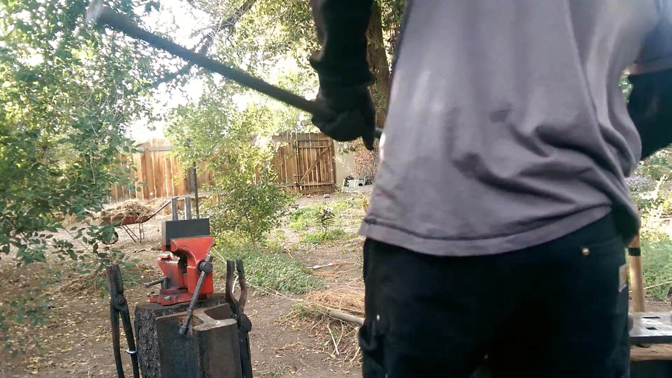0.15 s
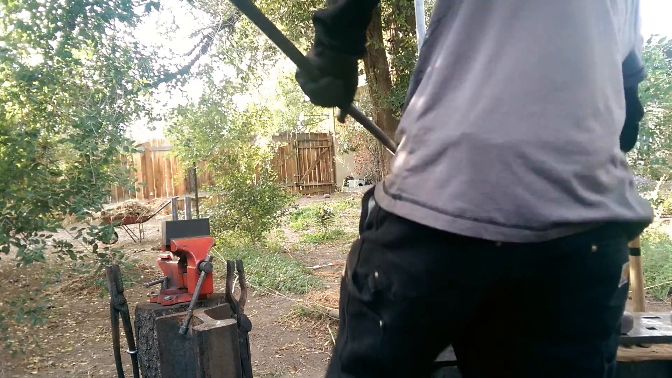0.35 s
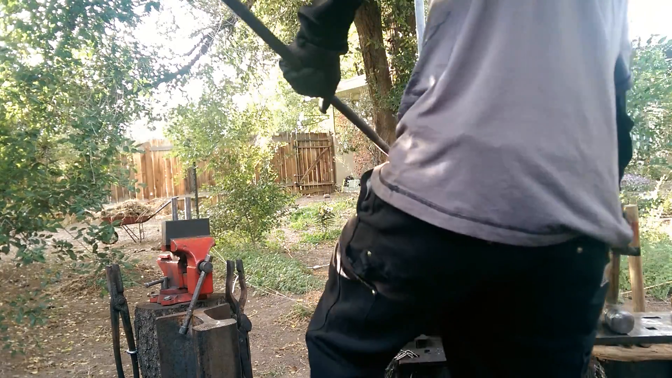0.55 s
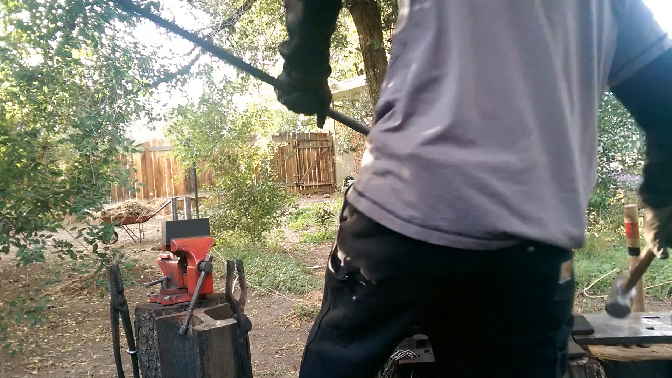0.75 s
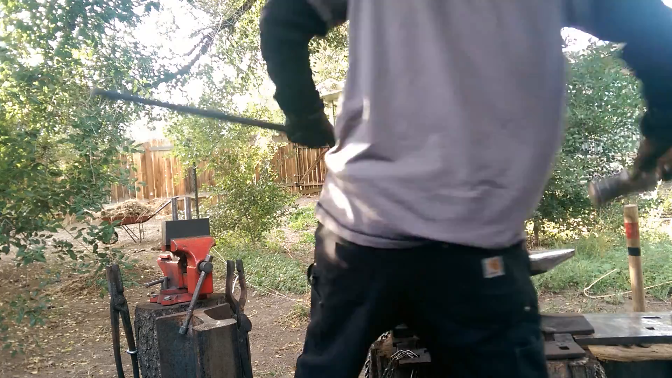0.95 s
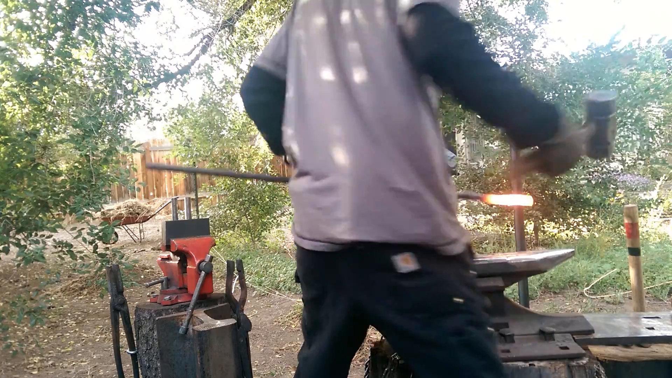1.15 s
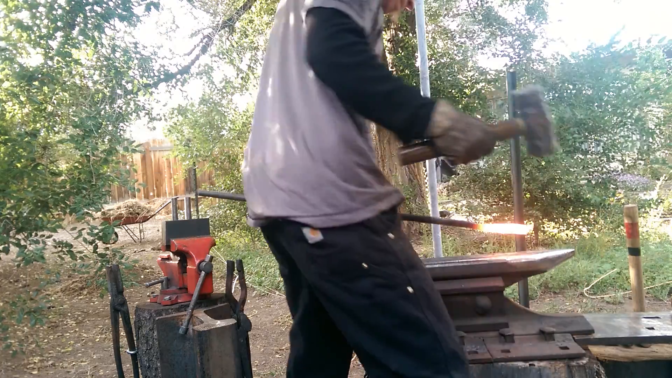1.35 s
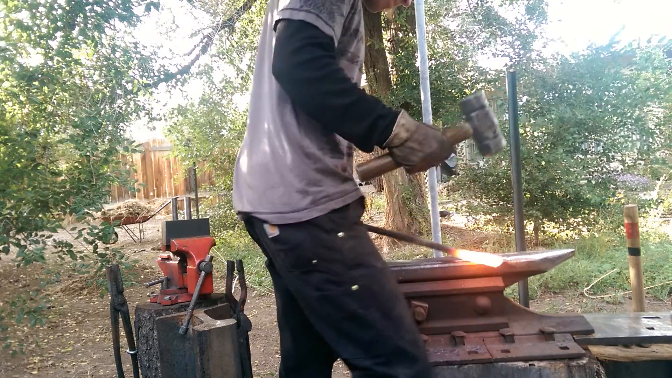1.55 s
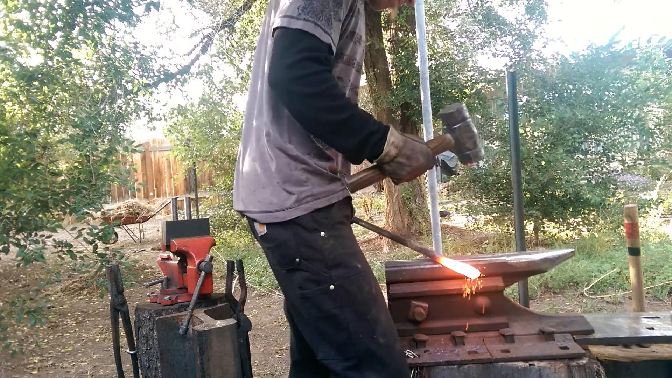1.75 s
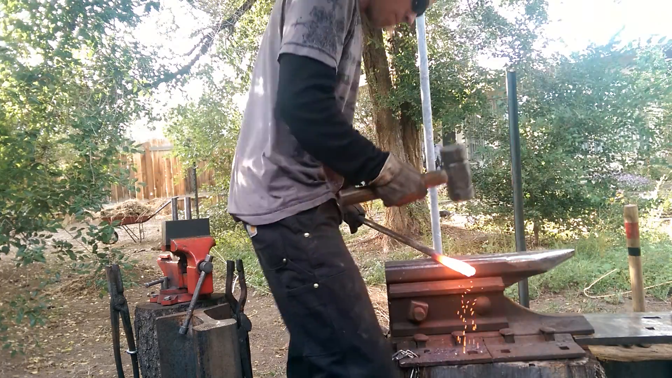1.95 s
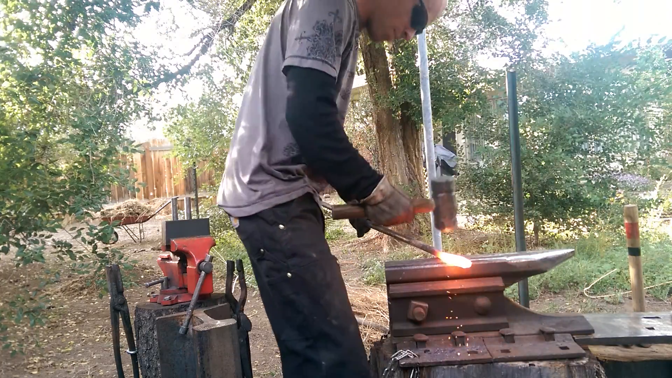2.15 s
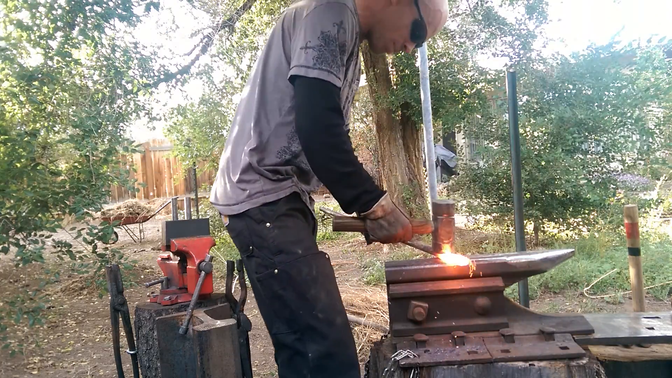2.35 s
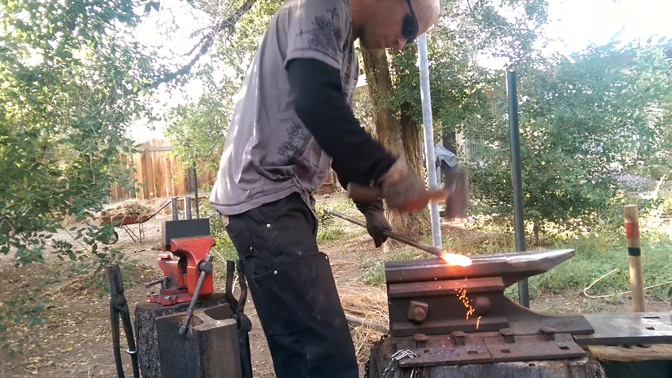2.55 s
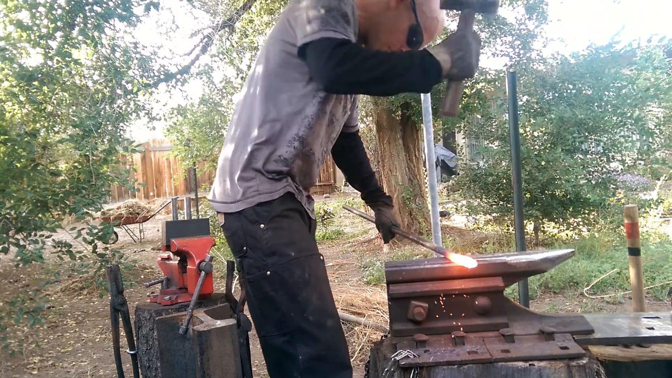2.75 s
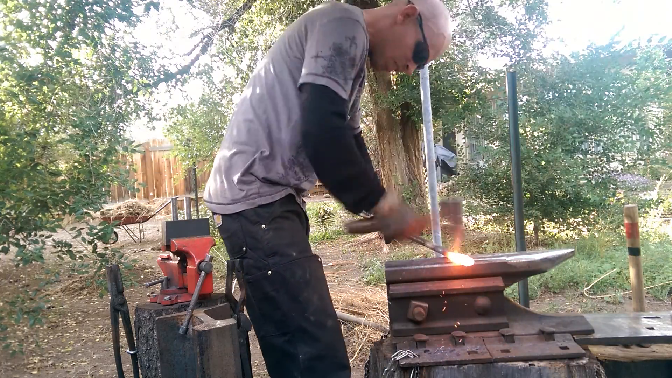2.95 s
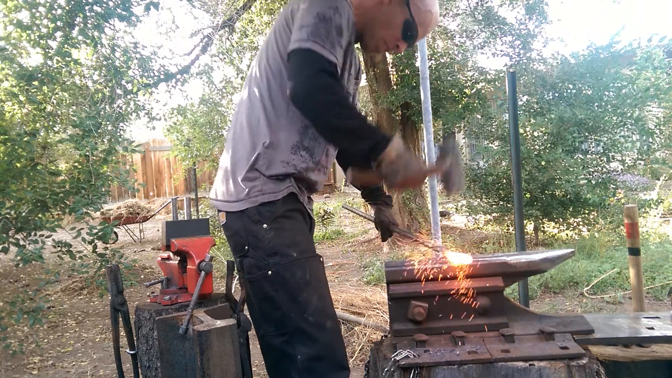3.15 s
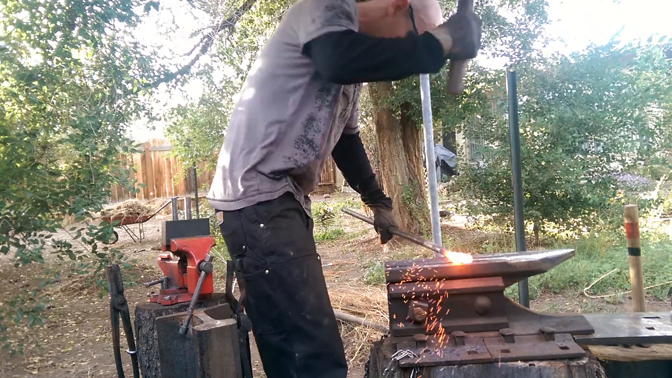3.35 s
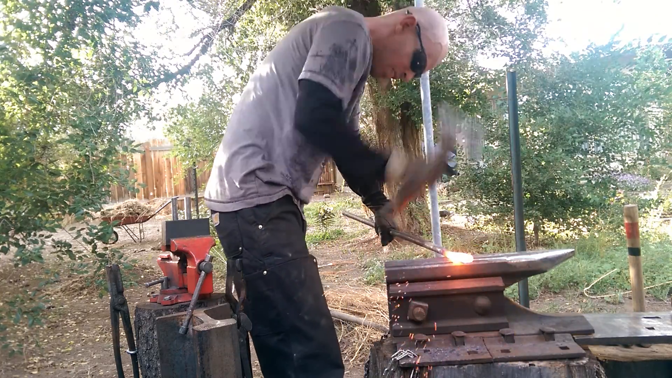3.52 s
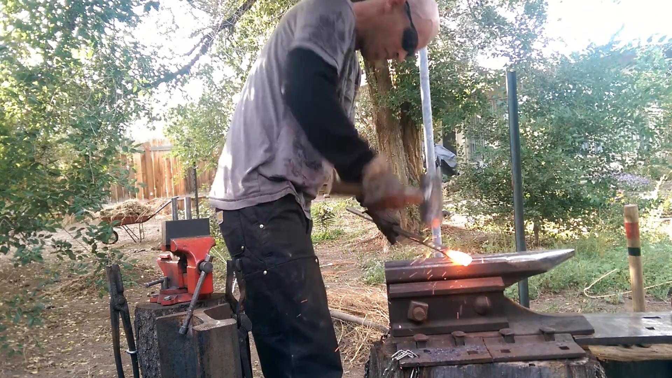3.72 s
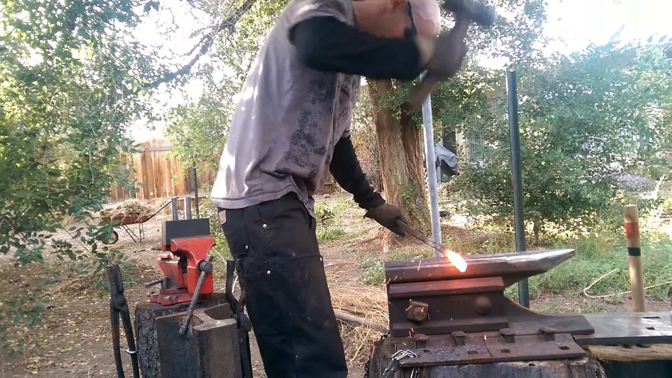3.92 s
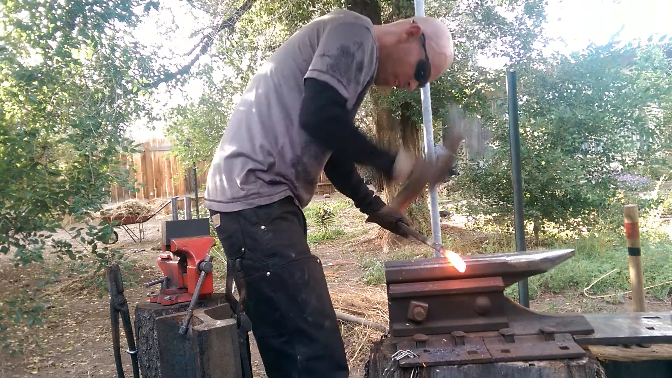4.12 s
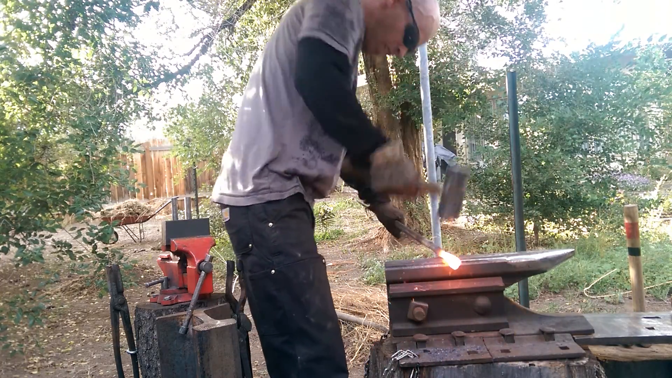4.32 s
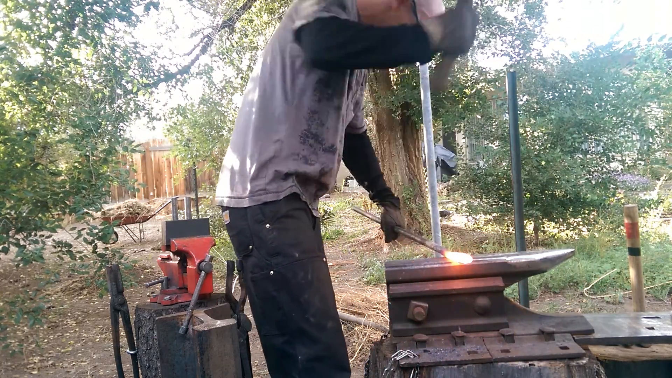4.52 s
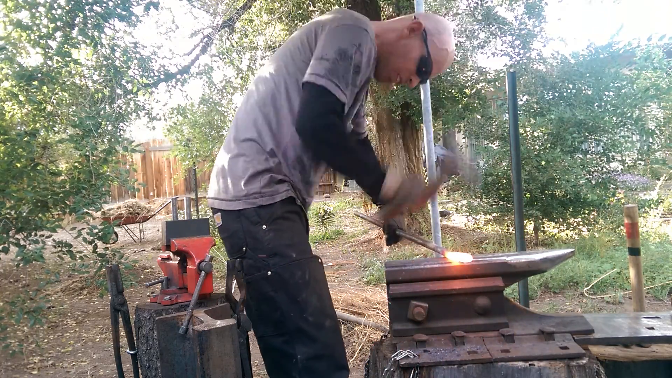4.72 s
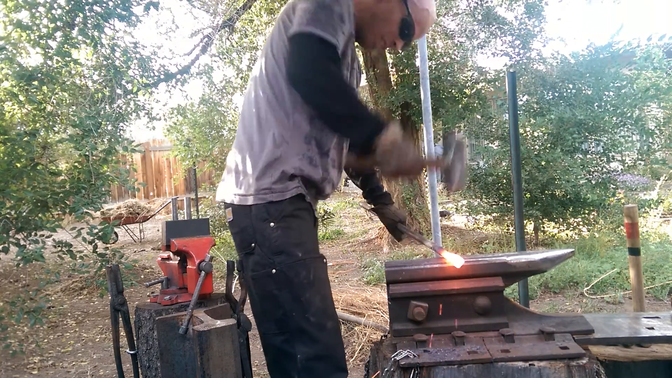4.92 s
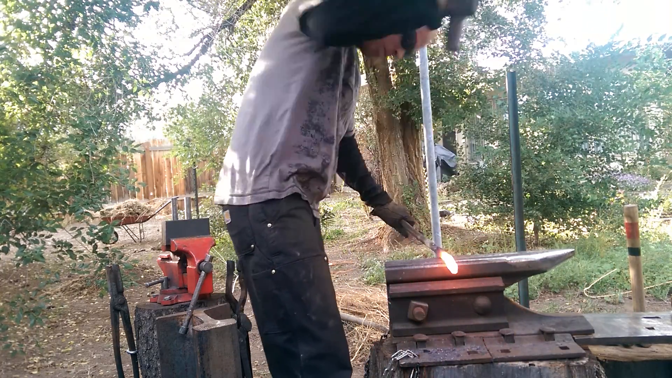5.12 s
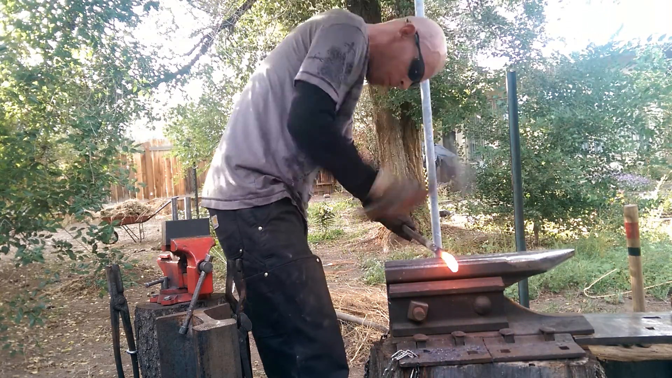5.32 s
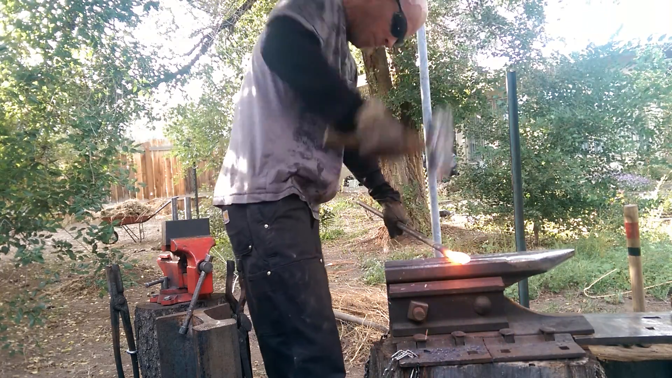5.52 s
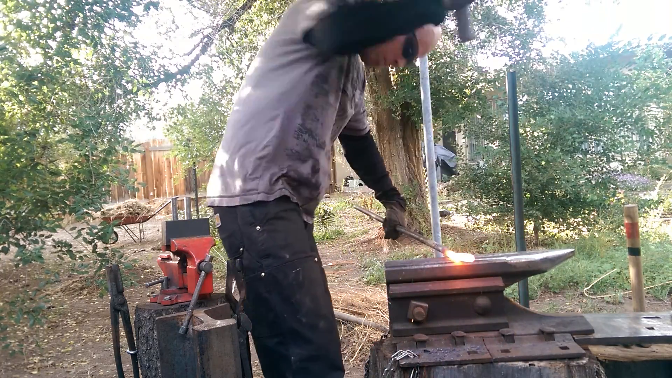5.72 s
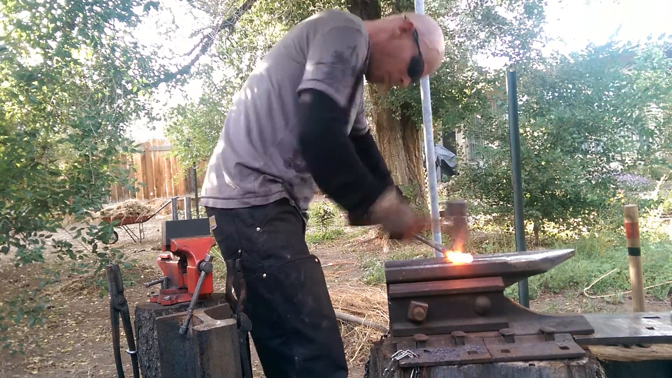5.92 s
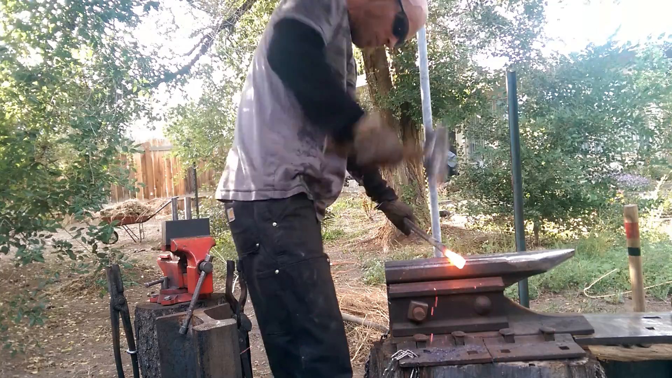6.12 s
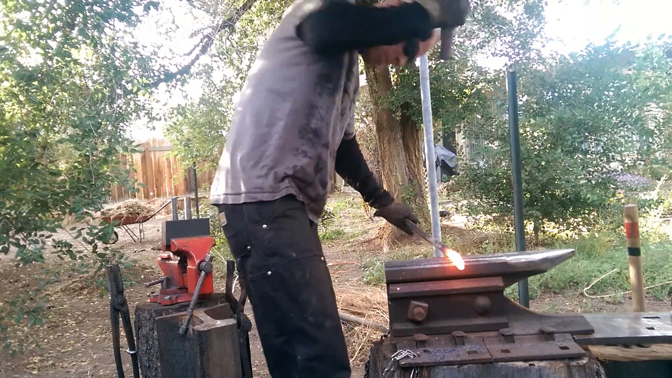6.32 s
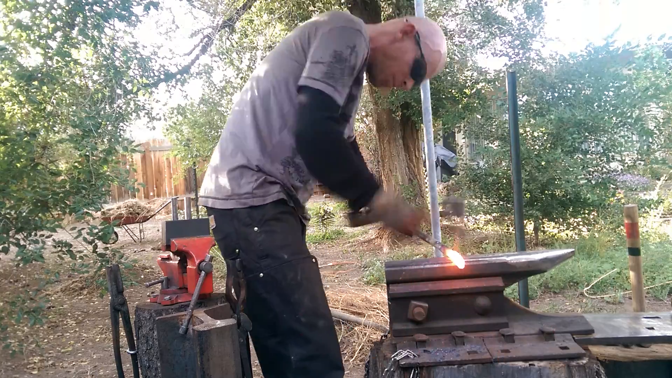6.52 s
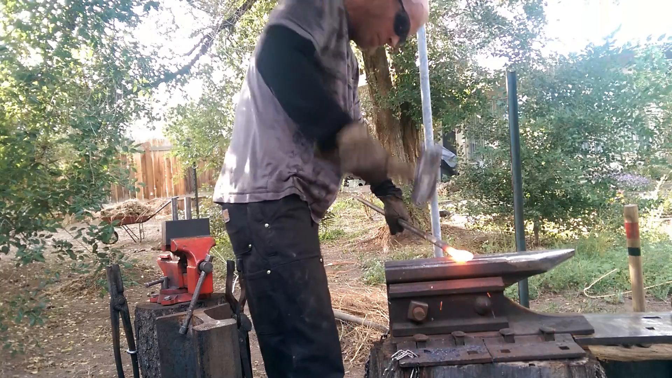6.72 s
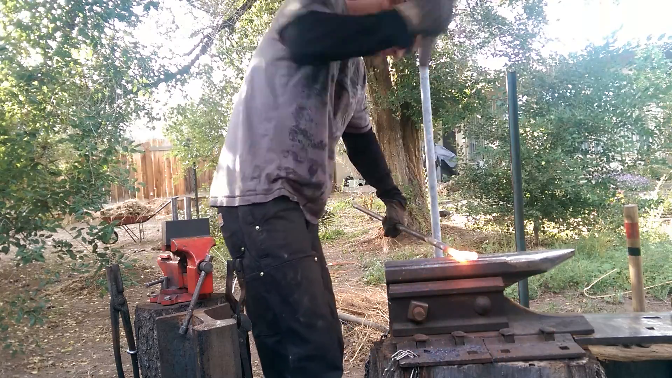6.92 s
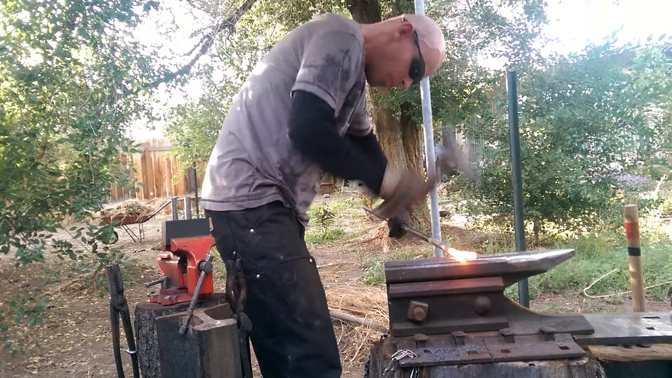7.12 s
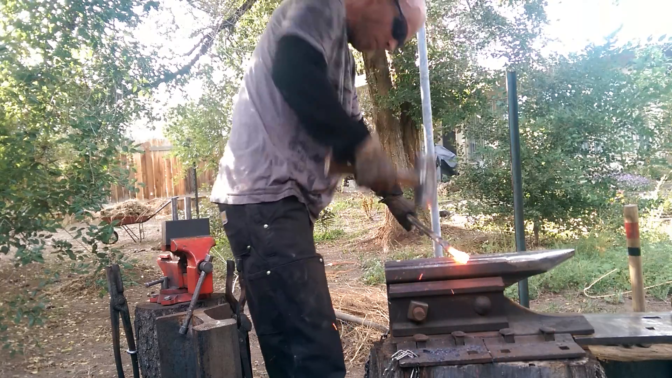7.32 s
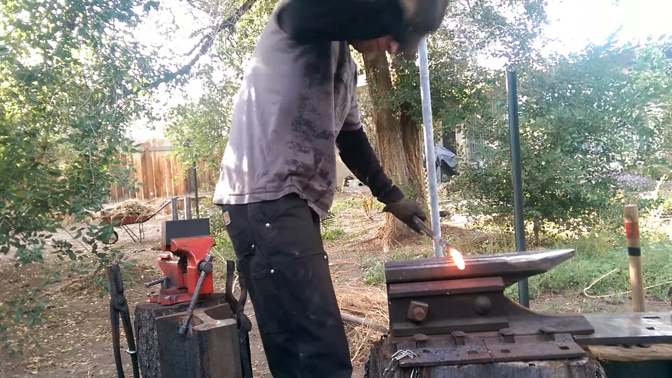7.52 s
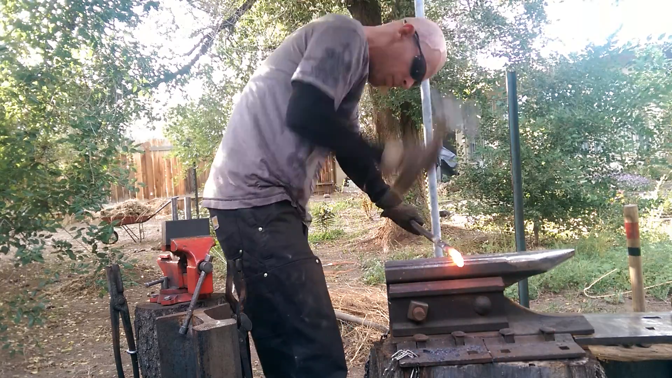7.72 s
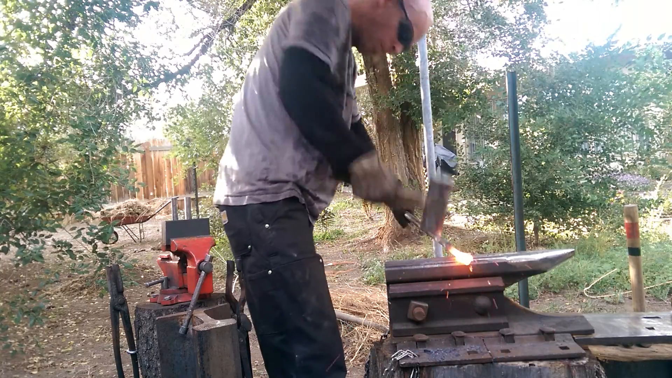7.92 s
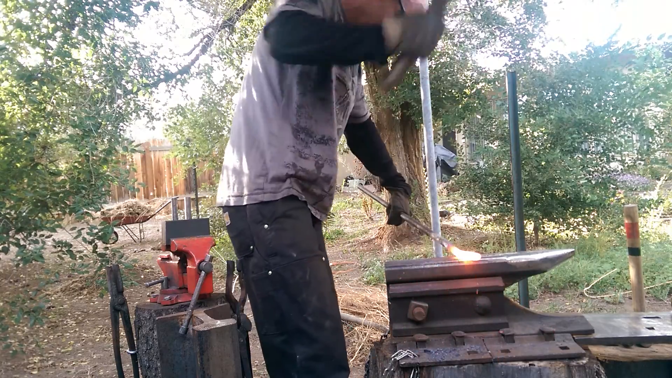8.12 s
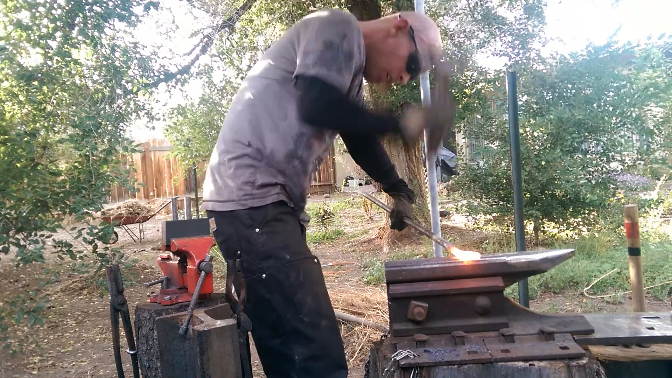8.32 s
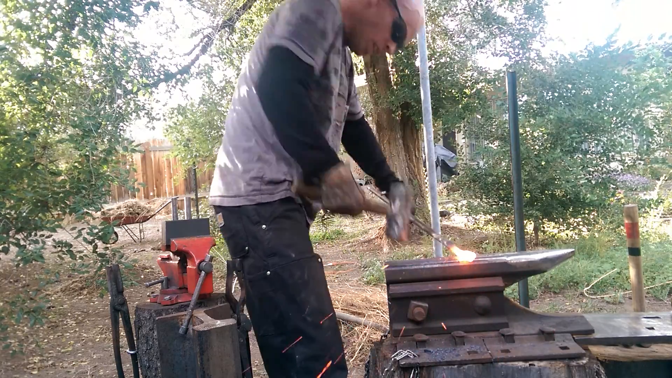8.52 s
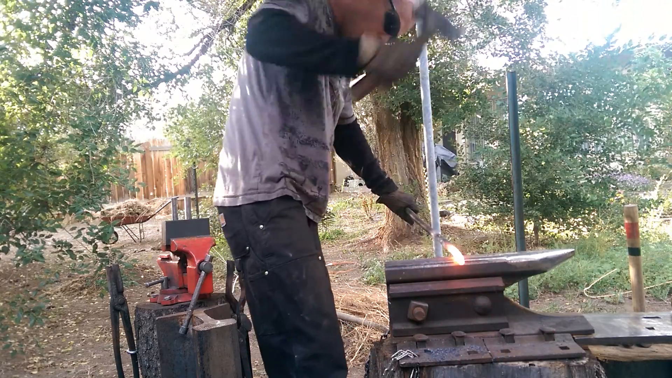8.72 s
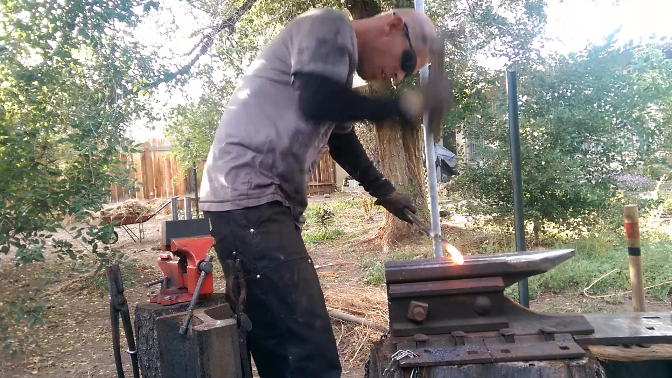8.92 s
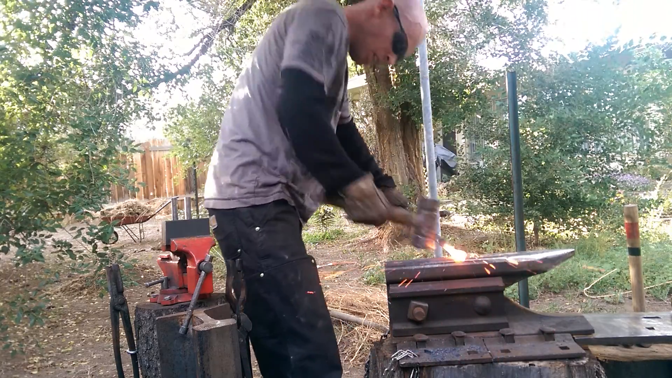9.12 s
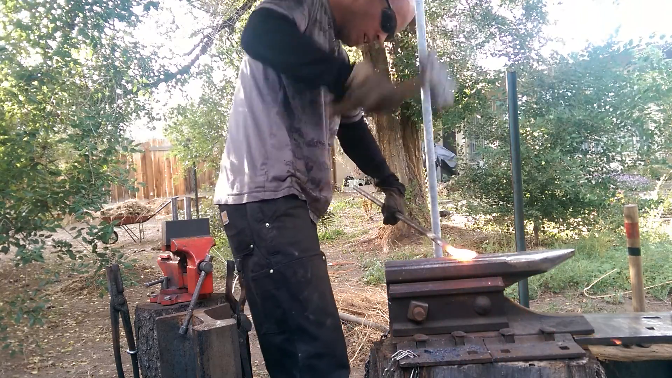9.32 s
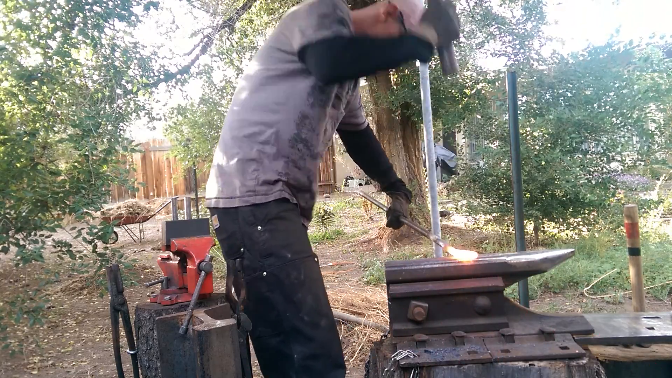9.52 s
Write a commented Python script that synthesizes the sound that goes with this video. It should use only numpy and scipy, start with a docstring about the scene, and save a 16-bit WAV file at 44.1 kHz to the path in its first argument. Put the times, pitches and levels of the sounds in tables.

```python
"""Forging in the yard

A hand hammer works a hot bar on a clamped rail anvil, off to the right. Each blow cracks, knocks,
thumps the stump and leaves anvil and hammer head ringing; fence and trees throw the crack back.
Forge coals snap and hiss nearby over a low outdoor rumble. Before the blows start, boots scuff and
the bar is laid down, slid and nudged; midway through the hammering a bird squeaks once."""
import sys
import numpy as np
from scipy import signal
from scipy.fft import rfft, irfft
from scipy.io import wavfile
from scipy.ndimage import uniform_filter1d

SR = 44100
rng = np.random.default_rng(int(sys.argv[2]) if len(sys.argv) > 2 else 0)


def master_out(mix):
    """Clip the mix to full scale and print it as 16-bit PCM to the path in sys.argv[1]."""
    frames = np.transpose(np.atleast_2d(mix))
    ceiling = np.clip(frames, -1, 1)
    pcm = np.round(ceiling * 32767).astype(np.int16)
    wavfile.write(sys.argv[1], SR, pcm)


N = 421155

# Tone of the outdoor bed. Each row: frequency in Hz, relative noise density in dB.
AIR_SPECTRUM = [(15, -18), (25, -12), (76, 5), (130, -2), (170, -17), (270, -13), (344, -21), (405, -20.5),
                (677, -20.5), (863, -21.5), (988, -24), (2350, -26), (5570, -38.5), (12500, -36.5),
                (16000, -42.5)]
# Snapping coals. Each row: start in seconds, peak in dB, dull body against the bright top in dB,
# left minus right in dB.
COAL_SNAPS = [(0.0014, -9, -16, 1.0), (0.0548, -28, -31, 5), (0.077, -15, -18, 6), (0.1165, -28, -28, -3),
              (0.1331, -2, -24, 5.5), (0.18, -25, -6, 0), (0.197, -21, -30, 8), (0.2224, -22, -13, 0),
              (0.238, -5.5, -10, 1.5), (0.2575, -21, -18, 7), (0.275, -24, -6, 9), (0.2855, -15.5, -7, 0),
              (0.312, -11, -23, 5), (0.355, -32, -26, 9), (0.3795, -29, -31, 5.5), (0.394, -22, -35, 6),
              (0.411, -22.5, -23, 8), (0.4214, -27, -8, -2), (0.4974, -21.5, -1.5, 2),
              (0.606, -36, -21, -2), (0.6215, -32, -20, -1.5), (0.6496, -27, -7, 4), (0.7122, -10, -20, 4),
              (0.7455, -30, -6, 6), (0.7953, -19, -9.5, 4), (0.85, -30, -15, 2), (0.9028, -34, -20, 6),
              (0.9563, -31, -20, 4), (0.9777, -23.5, -20, 4), (1.024, -34, -31, 6),
              (1.1171, -12.5, -12, 1.5), (1.2108, -24.5, -12, -2), (1.3461, -28.5, -5.5, 3),
              (1.4, -36, -19, 4), (1.429, -32, -23, 2), (1.5384, -3.5, -29, 5.5), (1.7365, -30, -22, 5),
              (1.7839, -11, -40, 3.5), (1.821, -23, -31, 1), (1.8527, -27, -33, 4), (1.9122, -34, -23, 4),
              (2.0198, -32.5, -32, 5), (2.0605, -26.5, -21, 2), (2.2366, -24, -9, 3),
              (2.4605, -27.5, -29, 3), (2.4794, -33, -31, 4), (2.6204, -18.5, -27, 0), (2.863, -32, -29, 5),
              (3.2236, -25.5, -4, 5), (3.27, -22.5, -9, 3), (3.3165, -20, -8.5, 2.5),
              (3.5405, -16, -27, 3.5), (3.5957, -28, -24.5, 5), (3.717, -18, -12, -1),
              (3.9043, -12, -18, 5.5), (4.992, -19.5, -18, 1), (5.649, -34, -8, -1), (5.9914, -24, -20, 9),
              (6.5316, -26.5, -9, 3), (6.8522, -7.5, -22, 1.5), (7.1564, -28.5, -1, 2),
              (7.4726, -32.5, 0, 2), (8.6544, -35, -15, -4), (8.76, -33, -10, 3), (8.7781, -15.5, -2, 2),
              (9.4642, -25, -28, 6.5)]
# The yard's echo. Each row: band centre in Hz, relative level in dB, time to fall 60 dB in seconds.
ECHO_BANDS = [(131.5, -10.5, 0.93), (246, -24, 0.44), (502, -25.5, 0.76), (1100, -23.5, 0.52),
              (2326, -21.5, 0.5), (4160, -21, 0.4), (8200, -22, 0.32), (14000, -42, .25)]
# Boots and bar scuffing. Each row: end of the attack in seconds, hold in seconds, level in dB,
# tonal centre in Hz.
SCUFFS = [(0.241, .06, -54, 900), (0.549, .04, -61, 706), (.85, 0.084, -56, 1000),
          (1.201, .16, -50.5, 1790), (2.279, 0.089, -49.5, 965)]
# The bar laid down, then nudged with the hammer. Each row: start in seconds, crack level in dB,
# brightness in dB per octave, clink level in dB, clunk level in dB.
BAR_TOUCHES = [(1.671, -26.5, 1, -28, -42), (2.317, -22, 1.5, -34, -23)]
# Tone of the steel-on-steel crack. Each row: frequency in Hz, relative noise density in dB.
CRACK_SPECTRUM = [(120, -27), (200, -9.5), (430, -3), (970, -4.5), (1360, 1.5), (2750, -7), (3780, -10.5),
                  (5080, -13), (8110, -20.5), (11900, -16.5), (16000, -37.5)]
# Hammer blows. Each row: start in seconds, crack level in dB, then knock, horn ring and head ring,
# each in dB against the crack.
BLOWS = [(3.042, -5.5, -16, -28, -40), (3.641, -3.5, -22, -34.5, -34), (4.233, -5, -14.5, -40, -36),
         (4.812, -5, -13, -30.5, -41.5), (5.399, -5, -15, -29, -36.5), (6.003, -6.5, -11.5, -27.5, -40.5),
         (6.601, -4, -20, -28.5, -45), (7.218, -6, -15, -29.5, -39), (7.831, -6.5, -14, -30.5, -41),
         (8.452, -7, -14, -32.5, -30.5), (9.097, -5.5, -14, -33, -47)]
# Ringing parts. Each row: frequency in Hz, relative level in dB, time to fall 60 dB in seconds.
KNOCK_MODES = [(245, -0.5, 0.094), (310, -6, 0.11), (349, 2, 0.05), (443, -2, 0.098), (503, -2.5, 0.091),
               (612, -18, 0.41), (734, -0.5, 0.043), (876, 0.5, 0.063), (1290, -1, 0.12)]  # bar and base plate, dull
CLINK_MODES = [(1650, -6, 0.22), (2000, 0.5, 0.16), (2290, -6.5, 0.12), (2464, 1.5, 0.2), (3620, -8, 0.1),
               (4300, -7, 0.12), (5300, -8, 0.087)]  # the bar's bright ring
CLUNK_MODES = [(240, -6, 0.15), (328, -0.5, 0.19), (600, -7, 0.13), (728, 0.5, 0.12), (936, -2.5, 0.097),
               (1215, -11, 0.12)]  # the bar's low ring
STUMP_MODES = [(53.3, -5, 0.57), (77.5, -6, 0.72), (110.7, -4.5, 0.6)]  # the stump under the anvil
HORN_MODES = [(1109, 2, .5), (2662, -1, .42), (2730, -9, .2)]  # the anvil's horn
HEAD_MODES = [(10810, 0, .36)]  # the hammer head
CLANG_MODES = [(342.4, -14, 1.92), (500, -11, 0.16), (569, -5.5, 0.65), (820, -4.5, 0.62),
               (1440, -3.5, 0.43), (1650, -22, 0.28), (2126, 5, .3), (2420, 2.5, 0.37), (3360, -17.5, .25),
               (4280, -12, 0.43), (5300, -17, 0.3), (11700, -13.5, 0.32), (12600, -23.5, 0.22)]  # steel ring of anvil and hammer that fades straight after the blow


def undb(db):
    """Decibels to amplitude."""
    return 10 ** (np.asarray(db) / 20)


def curve_db(table, hz):
    """A spectrum's level at these frequencies, joined by straight lines on a log axis."""
    table = np.array(table, float)
    return np.interp(np.log(hz + 1), np.log(table[:, 0] + 1), table[:, 1])


def stereo_noise(size, gain, wide_hz):
    """Noise coloured by gain(hz), rms 1: centred in the bass, spreading out above wide_hz."""
    hz = np.fft.rfftfreq(size, 1 / SR)
    mid, side = rfft(rng.standard_normal((2, size))) * gain(hz)
    out = irfft(mid + side * hz / (hz + wide_hz) * np.array([[1], [-1]]), size)
    return out / np.sqrt(np.mean(out ** 2))


def noise_band(size, centre_hz, octaves, wide_hz):
    """Stereo noise in a bell-shaped band."""
    return stereo_noise(size, lambda hz: np.exp(-(np.log2(hz / centre_hz + 1e-9) / octaves) ** 2), wide_hz)


def wander(size, rate):
    """A glide through `rate` random values a second, spread near 1."""
    step = int(SR / rate)
    return uniform_filter1d(np.repeat(rng.standard_normal(size // step + 1), step), step)[:size]


def fade(t, t60, hold=0.):
    """Full level for `hold` seconds, then down 60 dB every t60 seconds."""
    return np.exp(-np.log(1000) * np.maximum(t - hold, 0) / t60)


def ring(modes, t, scatter_db, waver_db, rate, hold=0.):
    """Decaying modes, struck anew each time; level and phase waver as the clamped steel rocks."""
    out = 0
    for hz, db, t60 in modes:
        level_db = db + scatter_db * rng.standard_normal() + waver_db * wander(len(t), rate)
        phase = rng.uniform(0, 2 * np.pi)
        left_shift = rng.uniform(-2.6, 2.38) * np.array([[1], [0]]) * hz / (hz + 300)
        phase = phase + left_shift + waver_db / 4 * wander(len(t), rate)
        out = out + undb(level_db) * fade(t, t60, hold) * np.sin(2 * np.pi * hz * t + phase)
    return out


def place(track, sound, start, left_lag_samples=14):
    """Lay a sound in from the right: it reaches the left side a little later."""
    for side, lag in enumerate((left_lag_samples, 0)):
        i = int(start * SR) + lag
        track[side, i:i + sound.shape[1]] += sound[side, :max(N - i, 0)]


def fire_hiss(treble, flare_db=14, settle_s=0.72):
    """The fire starts flared up and settles to a flickering hiss."""
    t = np.arange(N) / SR
    return treble * undb(3 + flare_db * np.exp(-t / settle_s) + 1.2 * wander(N, 25))


def hum(hz=348):
    """A faint, slightly unsteady hum that comes and goes."""
    level = undb(-71 + 3.9 * wander(N, 12))
    return level * np.sin(2 * np.pi * np.cumsum(hz * (1 + 0.01 * wander(N, 12))) / SR)


def outdoor_bed(rise_db_per_s=0.51):
    """A slowly growing rumble, the fire's hiss, a hum and a midrange wash, each wavering on its own."""
    t, hz = np.arange(N) / SR, np.fft.rfftfreq(N, 1 / SR)
    air = rfft(stereo_noise(N, lambda hz: undb(curve_db(AIR_SPECTRUM, hz)), 300) * undb(-51.5))
    low, high = 1 / (1 + (hz / 200) ** 4), 1 / (1 + (3000 / (hz + 1)) ** 4)
    bass, mids, treble = (irfft(air * band, N) for band in (low, 1 - low - high, high))
    rumble = bass * undb(-2 + rise_db_per_s * t + 2.2 * wander(N, 7))
    return rumble + fire_hiss(treble) + hum() + mids * undb(4.1 * wander(N, 2.677))


def coal_snap(body_db):
    """One snap, peak 1: a sharp tick, three weaker ones within 6 ms and a short tail of hiss."""
    t = np.arange(3000) / SR
    centre_hz = np.interp(body_db, [-1, 0], [13400, 5300])  # only the fullest snaps have a duller top
    hiss_db = -8.5 + 0.5 * rng.standard_normal()
    top = stereo_noise(len(t), lambda hz: (.5 + 1 / (1 + ((hz - centre_hz) / 3000) ** 2))
                       * hz ** 2 / (hz ** 2 + 3500 ** 2) / (1 + (hz / 14500) ** 8), 2000)
    body = stereo_noise(len(t), lambda hz: hz / (hz + 500) / (1 + (hz / 2500) ** 2), 1600)
    starts, sizes = np.r_[0, .006 * rng.random(3)], np.r_[1, .4 * rng.random(3)]
    ticks = sum(size * (t >= start) * fade(t - start, 0.0033) for size, start in zip(sizes, starts))
    snap = (top + undb(body_db) * body) * (ticks + undb(hiss_db) * fade(t, 0.078))
    return snap / np.abs(snap).max()


def coals():
    """The forge crackles: clear snaps among faint random ones, thickest at the start."""
    out = np.zeros((2, N))
    faint = [(9.4 * when ** 1.8, -55.5 + 21 * loud ** 2, -28 + 22 * body, 8 * pan - 2)
             for when, loud, body, pan in rng.random((120, 4))]
    for start, db, body_db, pan_db in COAL_SNAPS + faint:
        place(out, undb(db + np.array([[pan_db], [-pan_db]]) / 2) * coal_snap(body_db), start)
    return out


def yard_echo(send, rise_s=0.043, hold_s=0.062):
    """The tail after each crack swells, holds briefly, then dies away band by band."""
    t, tail = np.arange(40000) / SR, 0
    for hz, db, t60 in ECHO_BANDS:
        band = noise_band(len(t), hz, octaves=0.63, wide_hz=880)
        tail = tail + undb(db) * np.sqrt(hz / SR) * band * fade(t, t60, hold_s)
    tail = tail * (1 - np.exp(-(t / rise_s) ** 2)) * undb(-19.5)
    return signal.fftconvolve(send.mean(axis=0, keepdims=True), tail, axes=1)[:, :N]


def scuffs(attack_s=.03):
    """Grit crunches in quick uneven grains; the tonal centre blends a dull and a bright band."""
    out, t = np.zeros((2, N)), np.arange(20000) / SR
    for full_at, hold, db, centre_hz in SCUFFS:
        dull, bright = (noise_band(len(t), hz, octaves=1.53, wide_hz=690) for hz in (600, 2600))
        blend = np.clip(np.log2(centre_hz / 600) / 2, 0, 1)
        grit = np.sqrt(1 - blend) * dull + np.sqrt(blend) * bright
        grains = undb(db + 3.4 * wander(len(t), 219.3))
        envelope = np.clip(t / attack_s, 0, 1) ** 2 * fade(t, 0.19, attack_s + hold)
        place(out, grit * grains * envelope, full_at - attack_s)
    return out


def crack(db, tilt_db, knock_db):
    """The bar chatters on the anvil for a few ms and dies away over a dull knock; tilt is per octave."""
    t = np.arange(6000) / SR
    noise = stereo_noise(
        len(t), lambda hz: undb(curve_db(CRACK_SPECTRUM, hz) + tilt_db * np.log2(hz / 1500 + .05)), 1000)
    envelope = (1 - np.exp(-t / 0.00039)) * (fade(t, 0.043, hold=.006) + 0.35 * fade(t, 0.25))
    knock = (1 - np.exp(-t / 0.0012)) * ring(KNOCK_MODES, t, 1.5, 2.6, 101.6)
    lean_right = undb([[-2.5], [0.]])
    return (undb(db) * noise / 2 * envelope + undb(knock_db) * knock) * lean_right


def bar_touches():
    """Laid down and nudged, the bar gives a light crack, a clink and a clunk. Returns cracks, rings."""
    cracks, rings, t = np.zeros((2, N)), np.zeros((2, N)), np.arange(24000) / SR
    for start, db, tilt_db, clink_db, clunk_db in BAR_TOUCHES:
        place(cracks, crack(db, tilt_db, knock_db=db - 16.5), start)
        clink = undb(clink_db) * ring(CLINK_MODES, t, 1, 2, 90)
        clunk = undb(clunk_db) * ring(CLUNK_MODES, t, 1, 3, 200)
        place(rings, (1 - np.exp(-t / 0.0011)) * (clink + clunk), start)
    return cracks, rings


def bar_slide(length_s=.45, horn_hz=1117, width_hz=49):
    """The bar slides over the anvil's face and keeps the lowest horn mode faintly singing."""
    out, t = np.zeros((2, N)), np.arange(int(length_s * SR)) / SR
    tone = stereo_noise(len(t), lambda hz: 1 / (1 + (2 * (hz - horn_hz) / width_hz) ** 2), 900)
    swell = np.sqrt(np.sin(np.pi * t / length_s).clip(0))
    place(out, undb(-67) * tone * swell, start=1.84)
    return out


def hammer_blows(clang_db=-27.5, thump_db=-22):
    """Each blow cracks, thumps the stump and sets anvil, horn and head ringing. Returns cracks, rings."""
    cracks, rings, t = np.zeros((2, N)), np.zeros((2, N)), np.arange(24000) / SR
    for start, db, knock_db, horn_db, head_db in BLOWS:
        place(cracks, crack(db, tilt_db=-0.42, knock_db=db + knock_db), start)
        bloom = 1 - np.exp(-t / 0.006)  # head and horn ring freely once the hammer has left the bar
        stump = ring(STUMP_MODES, t, 1.3, 5, 25) * (1 - np.exp(-(t / 0.036) ** 2))  # ground answers late
        horn = ring(HORN_MODES, t, 1, 3.5, 80, hold=.07)
        head = ring(HEAD_MODES, t, 1, 3.5, 60, hold=.15)
        clang = ring(CLANG_MODES, t, 1.5, 4, 70)
        steel = undb(clang_db) * clang + bloom * (undb(horn_db) * horn + undb(head_db) * head)
        place(rings, undb(db) * (steel + undb(thump_db) * stump), start)
    return cracks, rings


def bird(start_s=6.365, end_s=6.59, hold_s=0.056, pitch_hz=1555, sag_hz_per_s=140):
    """A thin wavering squeak with its octave: swells, holds, sags, fades and breaks off."""
    t = np.arange(N) / SR - start_s
    hz = pitch_hz - sag_hz_per_s * np.clip(t - hold_s, 0, 1)
    phase = 2 * np.pi * np.cumsum(hz * (1 + 0.01 * wander(N, 50))) / SR
    envelope = np.clip(t / 0.026, 0, 1) ** 2 * fade(t, 0.98, hold_s)
    cutoff = np.clip((end_s - start_s - t) / .01, 0, 1)
    level = np.sqrt(2) * undb(-53.5 + 4 * wander(N, 60))
    return level * envelope * cutoff * (np.sin(phase) + fade(t, 0.55) * np.sin(2 * phase))


def scene():
    """Cracks and a little of the coals feed the yard's echo; everything else stays dry."""
    blow_cracks, blow_rings = hammer_blows()
    bar_cracks, bar_rings = bar_touches()
    cracks, rings = blow_cracks + bar_cracks, blow_rings + bar_rings
    snaps = coals()
    echo = yard_echo(cracks + undb(-11.5) * snaps)
    return cracks + rings + snaps + echo + outdoor_bed() + scuffs() + bar_slide() + bird()


def record(dry, top_hz=16300):
    """Soft saturation rounds the loudest peaks; a steep low-pass trims the very top."""
    lowpass = signal.ellip(8, .2, 70, top_hz, fs=SR, output="sos")
    return signal.sosfilt(lowpass, np.tanh(1.14 * dry) / 1.118)


dry = scene()
out = record(dry)
master_out(out)
```